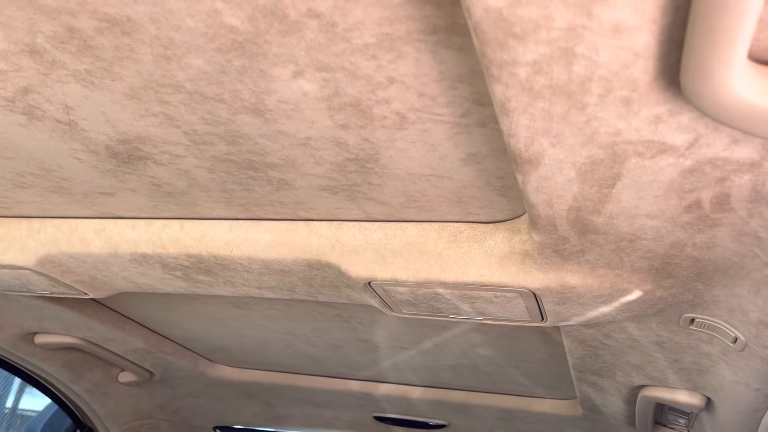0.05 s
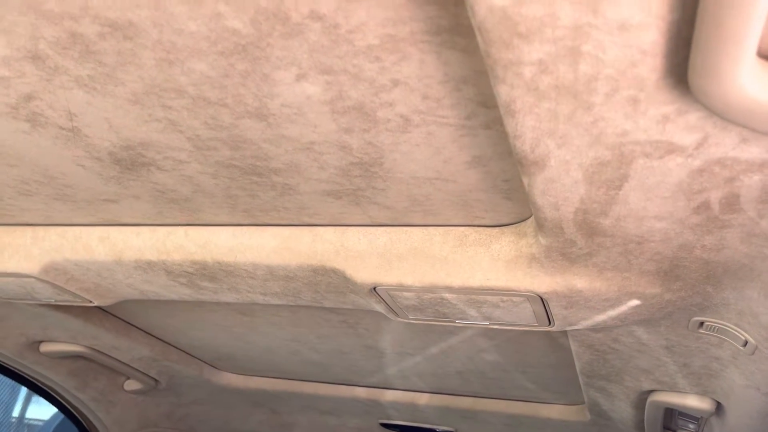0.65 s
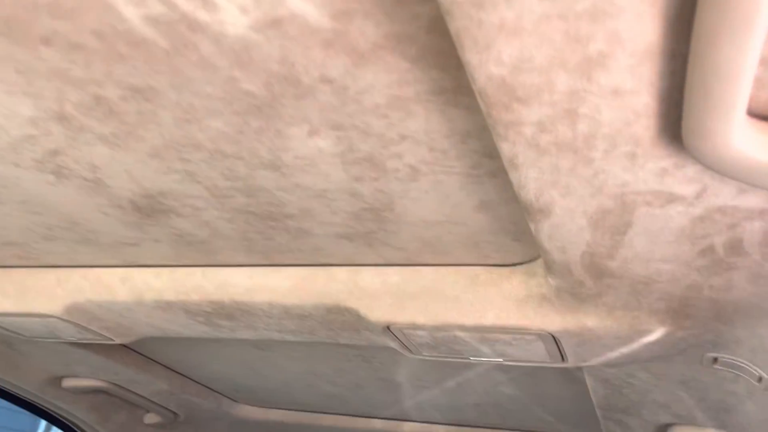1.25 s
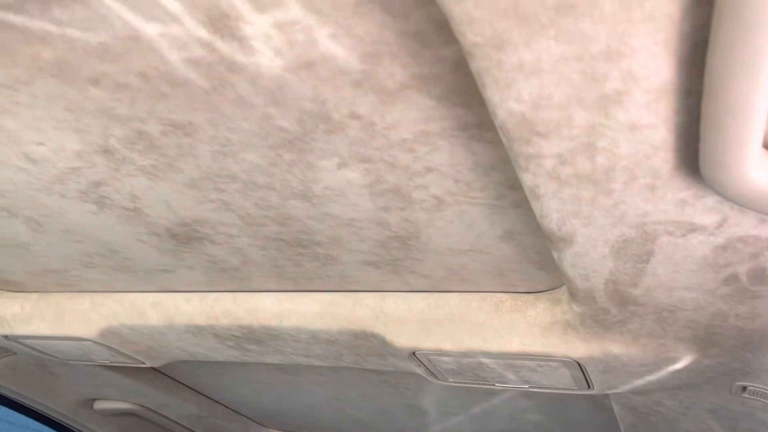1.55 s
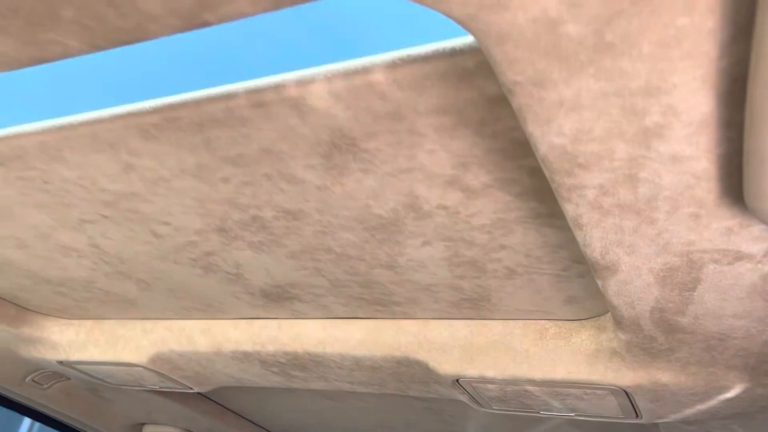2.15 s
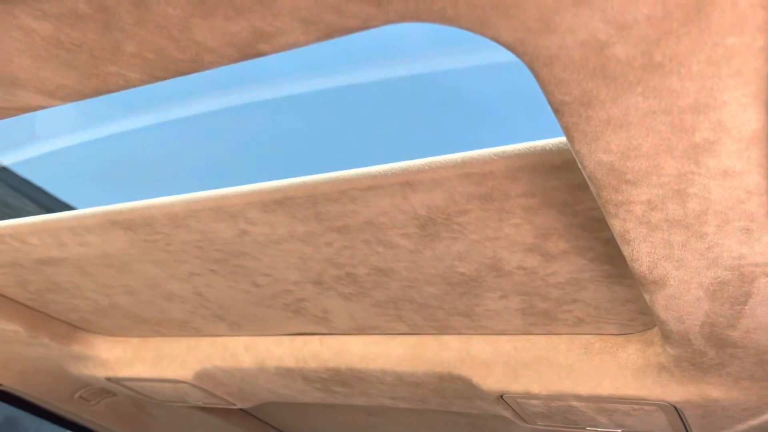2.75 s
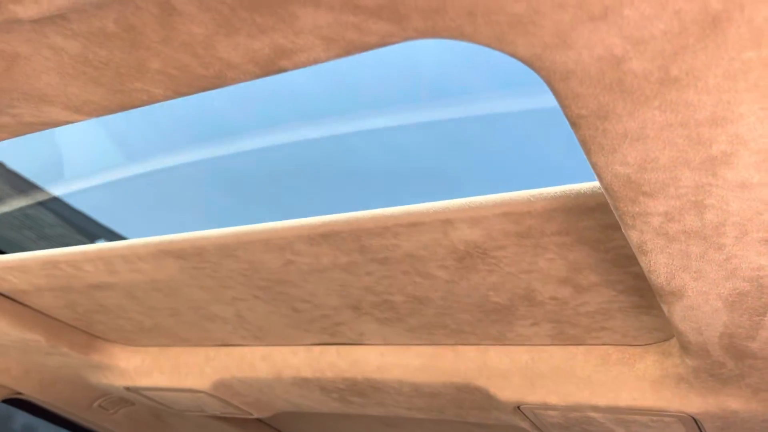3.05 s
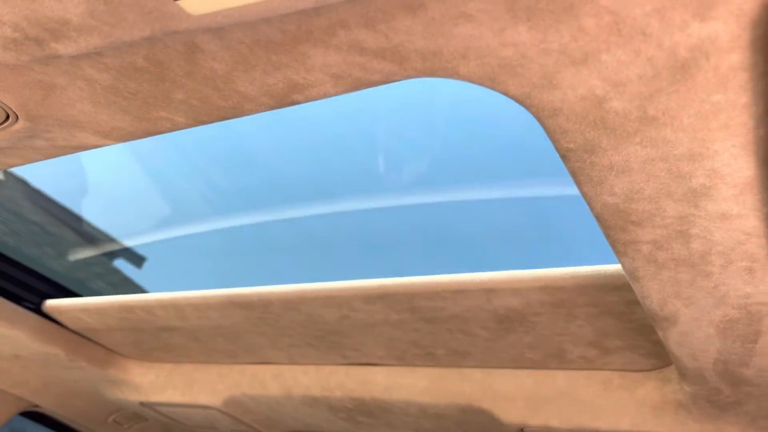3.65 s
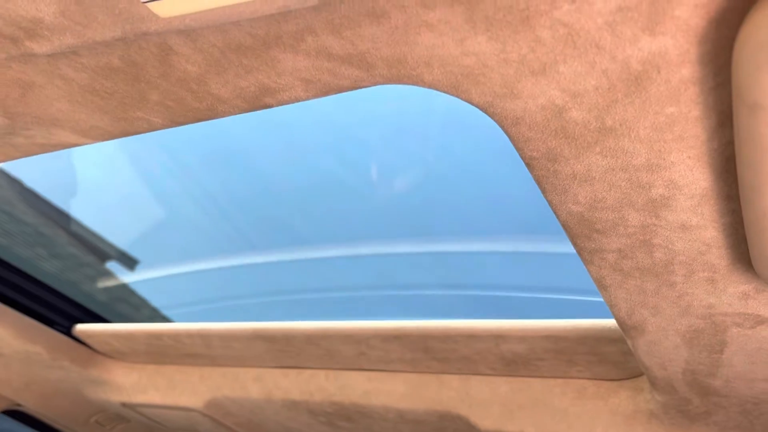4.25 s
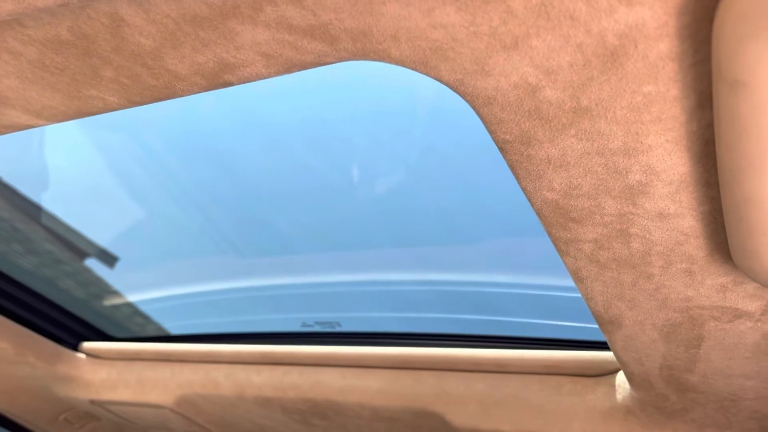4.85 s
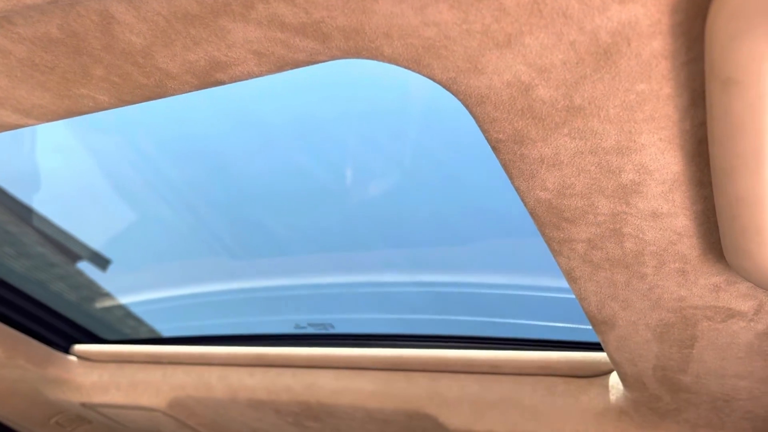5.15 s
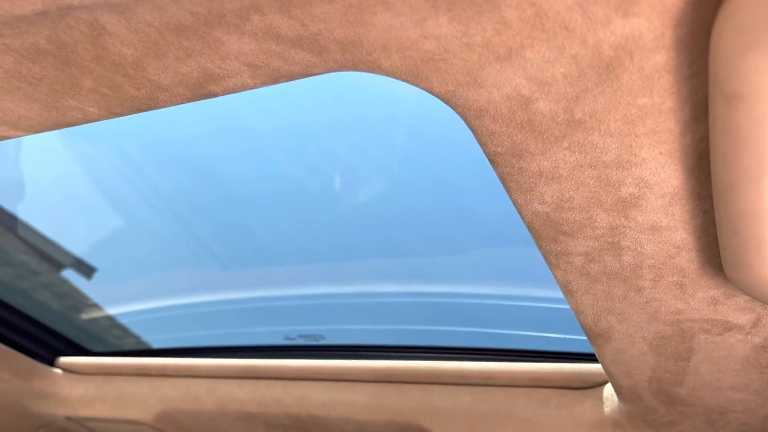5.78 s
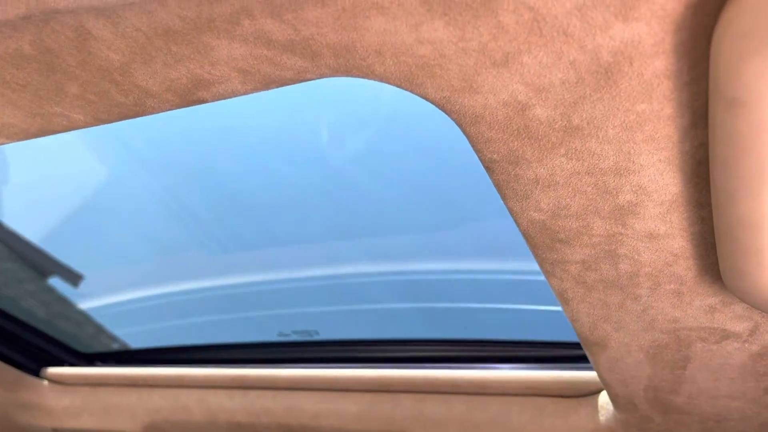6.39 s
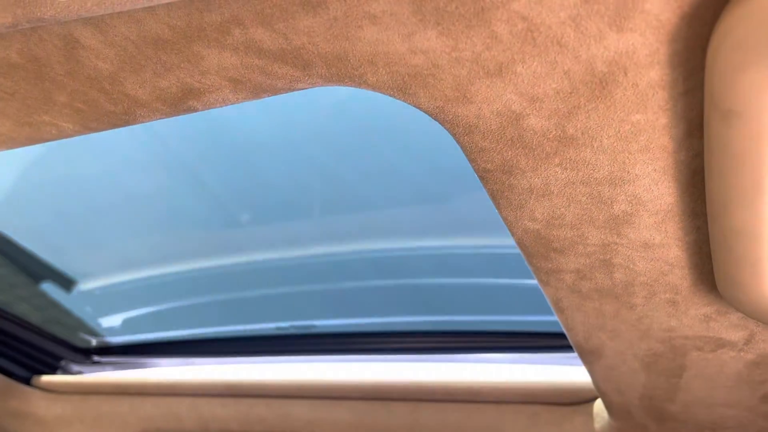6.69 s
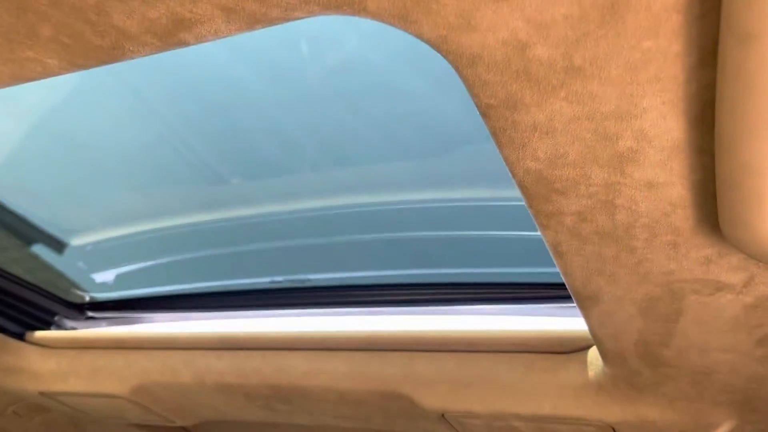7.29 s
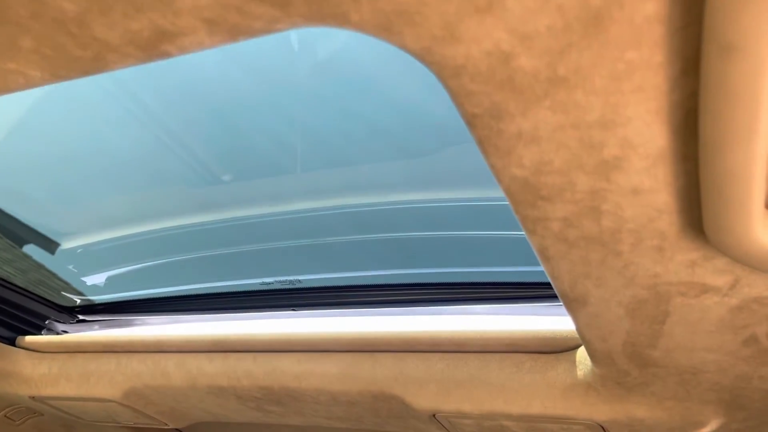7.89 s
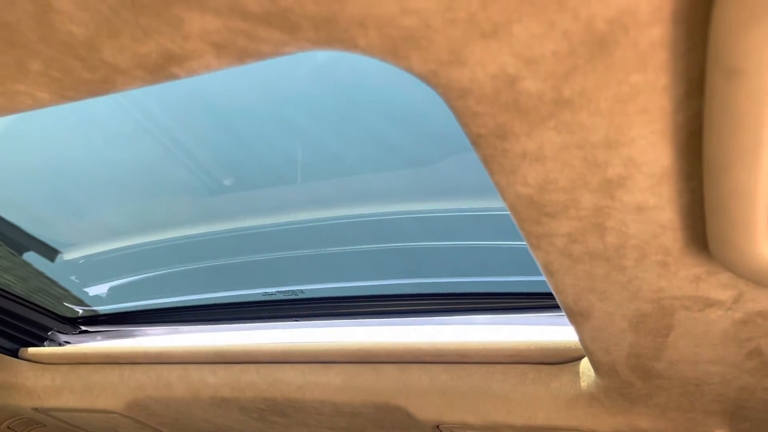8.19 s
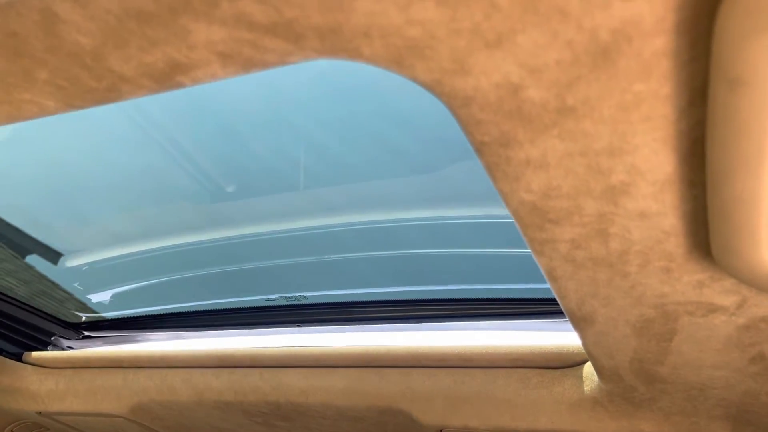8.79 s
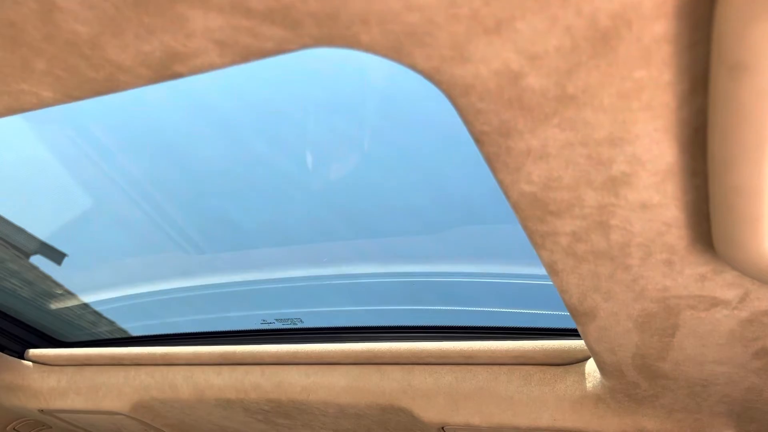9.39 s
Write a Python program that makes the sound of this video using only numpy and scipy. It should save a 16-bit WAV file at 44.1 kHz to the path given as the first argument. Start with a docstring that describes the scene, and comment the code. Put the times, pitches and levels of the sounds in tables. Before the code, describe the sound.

Inside an idling car, the ventilation blows and birds chirp faintly outside. A switch clicks and a small motor whines as the sunshade slides back, scraping louder until it bumps its stop. After more clicks, the glass roof panel unlatches and lifts, chafing on its rubber seal. Later it is sent back with clicks and a deep clunk. A phone picks it all up from just below the roof.

```python
"""Inside an idling car, the ventilation blows and birds chirp faintly outside. A switch clicks, and a
small motor slides the sunshade back along its guides, scraping ever louder into its pocket until it bumps
its stop. More switch clicks, and the glass panel lifts off its seal, chafing; later it is sent back with
a clunk. A phone with two ports hears it all from below the roof."""
import sys
import numpy as np
from scipy import signal
from scipy.fft import rfft, irfft, next_fast_len
from scipy.io import wavfile
from scipy.ndimage import uniform_filter1d

SR = 44100
rng = np.random.default_rng(int(sys.argv[2]) if len(sys.argv) > 2 else 0)


def master(y):
    """Save y as 16-bit WAV."""
    cut = np.clip(np.atleast_2d(y).T, -1, 1)
    pcm = np.round(cut * 32767)  # scale
    wavfile.write(sys.argv[1], SR, pcm.astype(np.int16))


N = 424683
T = np.arange(N) / SR
SHADE_START_S, SHADE_STOP_S = 1.52, 4.76
# modes of the roof frame (frequency [Hz], level [dB], t60 [s])
ROOF_MODES = [(94, -1, 0.071), (146, 4.5, 0.062), (257, 3, 0.059), (379, -4, 0.081), (466, -7, 0.086),
              (610, 2.5, 0.021), (940, -3, 0.06), (1166, -19, 0.044), (1438, -4.5, 0.05),
              (1980, -16, 0.035), (2990, -13, 0.067)]


def undb(db):
    """Decibels to gain."""
    return 10 ** (np.asarray(db) / 20)


def unit(x):
    """Scale to rms 1."""
    return x / np.sqrt(np.mean(x ** 2))


def filtered(x, gain):
    """Apply a response, given as a function of Hz."""
    size = next_fast_len(x.shape[-1])
    hz = np.arange(size // 2 + 1) * SR / size + 1e-3
    return irfft(rfft(x, size) * gain(hz), size)[..., :x.shape[-1]]


def colour(points):
    """An EQ curve through (frequency [Hz], level [dB]) points."""
    hz, db = np.transpose(points)
    return lambda f: undb(np.interp(np.log(f), np.log(hz), db))


def resonance(f, hz, width):
    """Response of one damped resonance, 1 at its centre."""
    return 1 / (1 + 1j * (f * f - hz * hz) / (f * width))


def resonate(x, hz, width):
    """Focus a sound around hz: two like resonances in series."""
    return filtered(x, lambda f: resonance(f, hz, width) ** 2)


def walk(rate):
    """Smooth random drift of rms 1, turning about rate times a second."""
    size = int(SR / rate)
    steps = np.repeat(rng.standard_normal(N // size + 2), size)
    return unit(uniform_filter1d(steps, size)[size:size + N])


def tone(hz):
    """A sine of rms 1 that follows a pitch curve."""
    return np.sqrt(2) * np.sin(2 * np.pi * np.cumsum(hz) / SR)


def add(out, s, sound):
    """Mix a short sound in at s seconds."""
    i = int(s * SR)
    out[:, i:i + sound.shape[-1]] += sound[..., :N - i]


def attack_at(x, db):
    """Set the rms level of the first 20 ms."""
    return x * undb(db) / np.sqrt(np.mean(x[..., :SR // 50] ** 2))


def field(size=N, side_db=0):
    """White noise at two ports: alike in the bass, diffuse in the mids."""
    # stereo width of the cabin (frequency [Hz], side minus mid [dB])
    diffusion = [(50, -15.5), (130, -17), (280, -10.5), (450, -4), (900, 1.5), (1600, -0.5), (2500, -6.5),
                 (5000, -8.5), (8000, -28.5)]
    mid, side = rng.standard_normal((2, size))
    ratio = lambda f: colour(diffusion)(f) * undb(side_db)
    mid = filtered(mid, lambda f: 1 / np.hypot(1, ratio(f)))
    side = filtered(side, lambda f: ratio(f) / np.hypot(1, ratio(f)))
    return np.array([mid + side, mid - side])


def air(spectrum, side_db, roof_db=-12):
    """Stereo noise with a spectrum in dB per Hz; the roof's upper modes stand a little out of it."""
    modes = lambda f: sum(resonance(f, hz, np.log(1000) / (np.pi * t60)) for hz, _, t60 in ROOF_MODES[6:])
    response = lambda f: colour(spectrum)(f) * (1 + undb(roof_db) * modes(f))
    return filtered(field(side_db=side_db), response) * np.sqrt(SR / 2)


def idle(flutter_db=1.5, pitch_wander=0.00489):
    """The bed: wavering engine tones and a clear blower tone over rumble and vent air."""
    # tones of the idling engine (frequency [Hz], level [dB])
    hum = [(29.2, -50), (62.02, -35), (104.05, -43.5), (124.6, -45), (134.9, -49), (189.8, -48),
           (262.2, -50)]
    # the ventilation blower's tone, sinking a little (time [s], pitch [Hz], level [dB])
    blower_curve = [(0, 318.8, -45.5), (3.9, 318.3, -46.5), (6.3, 316.4, -47), (9.6, 315.9, -46.5)]
    # cabin rumble and vent air (frequency [Hz], level [dB per Hz])
    cabin_spectrum = [(18, -106), (30, -74), (50, -56.5), (80, -55), (115, -54), (165, -61), (280, -63.5),
                      (380, -69), (800, -75.5), (1300, -79.5), (1700, -84.5), (2200, -88), (3500, -99.0),
                      (7000, -108.0), (9600, -105), (11400, -126), (13500, -155)]
    engine = sum(undb(db + flutter_db * walk(6)) * tone(hz * (1 + pitch_wander * walk(2.5)))
                 for hz, db in hum)
    times, pitch, level = np.transpose(blower_curve)
    blower = undb(np.interp(T, times, level) + 0.5 * walk(5.8)) * tone(np.interp(T, times, pitch))
    return engine + blower + air(cabin_spectrum, side_db=2.5) * undb(0.92 * walk(12))


def twitter(note_s, start_s=0.036, gap_s=0.045, high_hz=8430, low_hz=7650, fade_db_per_s=10):
    """A small bird's fading run of notes: high ones and softer low ones in turn, at an uneven pace."""
    notes = []
    for k, (sharp, loud, late) in enumerate(rng.standard_normal((13, 3))):
        s = abs(start_s + (k + .2 * late) * gap_s)
        detune = 1 + .035 * sharp
        db = -63 - fade_db_per_s * k * gap_s + 4 * loud
        notes += [(s, note_s, high_hz * detune, db), (s + gap_s / 2, note_s, low_hz * detune, db - 5.5)]
    return notes


def birds(note_s=0.022, arch_hz_per_s=7500, slur_hz_per_s=14000, echo_t60=0.35, echo_db=-3):
    """Wavering, arched whistles, the short ones slurred up or down; they scatter on the way in."""
    # lone calls of a second bird (time [s], length [s], top pitch [Hz], level [dB])
    chirps = [(0.612, 0.054, 4700, -72), (0.94, 0.038, 3930, -70), (1.255, 0.032, 3950, -68),
              (4.987, .085, 3920, -67)]
    out, wobble = np.zeros((1, N)), 1 + .016 * walk(500)
    for s, length, top_hz, db in twitter(note_s) + chirps:
        u = np.linspace(-1, 1, int(length * SR))
        slur = slur_hz_per_s * rng.standard_normal() * (length <= note_s)
        contour = top_hz + length * (slur * u / 2 - arch_hz_per_s * u ** 2)
        whistle = tone(contour * wobble[int(s * SR):][:len(u)])
        add(out, s, undb(db) * unit(signal.windows.tukey(len(u), .3) * whistle))
    t = T[:SR // 4]
    echo = field(len(t)) * undb(-60 * t / echo_t60)
    echo /= np.sqrt(np.sum(echo ** 2) / 2)
    return out + undb(echo_db) * signal.fftconvolve(out, echo, axes=1)[:, :N]


def clicks(tail_db=-21, tail_t60=0.18, ring_t60=.02):
    """A brief contact rattles the trim and rings the struck part; the padded cabin adds a short tail."""
    # clicks of switches and trim
    # (time [s], level [dB], brightness [dB per octave], contact time [s], ring [Hz], ring level [dB])
    contacts = [(0.066, -52.5, 1.5, 0.0071, 2020, -50), (0.83, -69, -4, .002, 6460, -70),
                (1.222, -69, 6, 0.0028, 2020, -67), (1.283, -58.5, 0.5, 0.0081, 2360, -54.5),
                (1.393, -58.5, 0, 0.0028, 2500, -68), (1.461, -59, 0, .003, 10900, -56),
                (1.498, -52.5, 5, 0.0027, 10300, -45), (1.541, -41.5, 4, 0.0066, 2170, -41),
                (1.545, -53, -3, 0.0071, 2700, -50), (1.885, -46, 0, .0043, 8960, -51),
                (1.943, -54, 0.5, .004, 2100, -50), (4.755, -56, -1, 0.0098, 1000, -51),
                (5.58, -61, -7.5, 0.012, 2940, -65), (5.803, -59, 0, .002, 2250, -69),
                (5.828, -41, 5, 0.0034, 6200, -49), (5.871, -56.5, 0, .0018, 7900, -60),
                (5.908, -51.5, 1.5, 0.0031, 7900, -51), (5.971, -53, -0.5, 0.004, 5870, -54),
                (6.029, -52, 3, 0.0072, 2050, -42), (6.219, -59, -6, .003, 2600, -54),
                (6.325, -56, 1.5, 0.0029, 5300, -58), (6.696, -57, 2.5, 0.0035, 2200, -63),
                (7.315, -53.5, 3.5, 0.011, 2420, -59), (8.428, -65, 10, 0.0022, 2300, -61),
                (8.6, -48, -1.5, 0.0053, 2350, -45.5), (8.622, -51, 0, 0.0045, 3400, -55),
                (8.663, -60, 3, .0023, 7500, -55), (8.691, -56, 1, 0.0034, 6170, -63),
                (8.722, -62, -12, 0.0051, 6300, -53), (8.743, -59, -8, .004, 4540, -54)]
    # colour of the clicks: plastic trim resonances and the microphone's bright peak near 10 kHz
    # (frequency [Hz], width [Hz], level [dB])
    click_peaks = [(2270, 1100, 8), (3330, 860, 1), (5850, 1750, 14), (9460, 3500, 18)]
    # a click's body, edge, snap and top (low edge [Hz], high edge [Hz])
    bands_hz = [(1400, 4200), (4200, 7500), (7500, 11400), (12400, 15800)]
    band_db = np.array([2, 0, 2.5, -24])
    bands = [signal.butter(3, band, "band", fs=SR, output="sos") for band in bands_hz]
    octaves = np.log2(np.array(bands_hz) / 5000).mean(axis=1)
    click_colour = lambda f: sum(undb(db) * resonance(f, hz, width) for hz, width, db in click_peaks)
    ring_width = np.log(1000) / (np.pi * ring_t60)
    out, t = np.zeros((2, N)), T[:SR // 8]
    for s, level_db, brightness, contact_s, ring_hz, ring_db in contacts:
        direct = field(len(t)) * np.exp(-t / contact_s)
        tail = field(len(t)) * undb(tail_db - 60 * t / tail_t60)
        crack = filtered(direct + tail, click_colour)
        for band, db in zip(bands, level_db + band_db + brightness * octaves):
            add(out, s, attack_at(signal.sosfilt(band, crack), db))
        ring = filtered(direct, lambda f: resonance(f, ring_hz, ring_width))
        add(out, s, attack_at(ring, ring_db))
    return out


def chafes(grip_db=2, spurt_db=2):
    """A rubbing contact sticks and slips in spurts, ringing one broad resonance."""
    # chafes and squeaks of guides and rubber seals
    # (time [s], length [s], pitch [Hz], width [Hz], level [dB])
    rubs = [(1.454, .07, 750, 1100, -45.5), (6.134, 0.008, 4750, 1500, -51),
            (6.157, 0.012, 5170, 1200, -57), (6.204, 0.11, 850, 646, -44), (6.228, 0.069, 5530, 6000, -58),
            (6.544, 0.125, 2700, 1500, -53), (8.789, 0.15, 2380, 1200, -57)]
    out, grip = np.zeros((2, N)), undb(grip_db * walk(150) + spurt_db * walk(30))
    for s, length, hz, width, db in rubs:
        size = int(length * SR)
        envelope = signal.windows.tukey(size, .5) * grip[int(s * SR):][:size]
        add(out, s, undb(db) * unit(resonate(field(size), hz, width) * envelope))
    return out


def knocks(rattle_top_hz=6000, rattle_db=-7.5, rattle_t60=.065, breadth=0.75):
    """The drive takes up slack, latches or meets a stop: the roof frame rings and loose parts rattle."""
    # bumps of the drive (time [s], level [dB], spectral centre [Hz])
    bumps = [(1.468, -34.5, 383), (1.484, -31, 338), (1.885, -37.5, 390), (4.763, -31, 390),
             (5.981, -31, 250), (6.01, -35.5, 930), (6.033, -39.5, 485), (8.736, -33.5, 590),
             (8.774, -27.5, 102)]
    out, t = np.zeros((2, N)), T[:SR // 4]
    hz, db, t60 = np.transpose(ROOF_MODES)[:, :, None]
    for s, level_db, centre_hz in bumps + latch_blows():
        # low modes start together; higher ones reach the two ports with unlike phases
        phase = rng.standard_normal((2, *hz.shape)) * np.minimum(hz / 700, 1.1)
        ring = np.sum(undb(db - 60 * t / t60) * np.sin(2 * np.pi * hz * t + phase), axis=1)
        rattle = filtered(field(len(t)), lambda f: 1 / (1 + (f / rattle_top_hz) ** 8))
        rattle *= undb(-60 * t / rattle_t60)
        hit = attack_at(ring, 0) + attack_at(rattle, rattle_db)
        add(out, s, attack_at(resonate(hit, centre_hz, breadth * centre_hz), level_db))
    return out


def running(start, stop, spin_up_s=0.011, spin_down_s=0.029):
    """A motor's effort, 0-1: it spins up, holds and spins down."""
    return np.clip((T - start) / spin_up_s, 0, 1) * np.clip(1 - (T - stop) / spin_down_s, 0, 1)


def slide(motor, rub, spectrum, split_hz, grain_db):
    """A driven panel: the motor shakes the roof below split_hz, grainy friction hisses above it."""
    noise = air(spectrum, side_db=-0.5)
    low = filtered(noise, lambda f: 1 / (1 + (f / split_hz) ** 2))
    rumble = low * motor * undb(0.19 * walk(27))
    hiss = (noise - low) * rub * undb(grain_db * walk(400) + 0.5 * walk(22))
    return rumble + hiss


def shade(drag_start_db=-16.5, drag_end_db=-2.5, build_s=0.74, whine_hz=624, whine_db=-53.5, sag=.022):
    """The sunshade rubs louder as its drag builds; the motor's whine swells and creeps up to pitch."""
    # friction of the sunshade in its guides (frequency [Hz], level [dB per Hz])
    friction_spectrum = [(150, -64), (260, -61), (450, -76), (750, -82.5), (1300, -88), (2100, -88.5),
                         (3200, -91), (5300, -92.5), (7000, -93), (8800, -89), (10400, -85.5),
                         (11500, -91.5), (12500, -113), (14000, -155)]
    motor = running(SHADE_START_S, SHADE_STOP_S)
    slack = np.exp(-np.maximum(T - SHADE_START_S, 0) / build_s)
    drag = undb(drag_end_db + (drag_start_db - drag_end_db) * slack)
    hz = whine_hz * (1 - sag * slack) * (1 + 0.00404 * walk(25))
    swell = motor * np.sqrt(1 - slack) * undb(whine_db + 2 * walk(16))
    whine = swell * (tone(hz) + undb(-15) * tone(2 * hz))
    return whine + slide(motor, motor * drag, friction_spectrum, split_hz=2800, grain_db=1.1)


def latch_blows(crack_hz=2580, catch_hz=1420, rail_hz=670):
    """Hits for knocks(): each latch cracks and strikes its catch, then rail and frame, ever deeper."""
    # latches (time [s], crack [dB], catch [dB], settling time [s], frame [dB], frame centre [Hz])
    latches = [(1.541, -49, -42.5, 0.0033, -33, 310), (6.025, -45, -40.5, 0.0039, -30, 254),
               (8.722, -44.5, -32, 0.0127, -24.5, 200)]
    hits = []
    for s, crack_db, catch_db, settle_s, frame_db, frame_hz in latches:
        hits += [(s, crack_db, crack_hz), (s, catch_db, catch_hz),
                 (s + settle_s / 2, catch_db + 2, rail_hz), (s + settle_s, frame_db, frame_hz)]
    return hits


def tight_spot(peak_s=3.18, spread_s=0.56, peak_db=-56.5, grain_db=1.7):
    """The shade's edge rubs harder, then eases, as it passes a tight stretch of its guides."""
    pressure = running(SHADE_START_S, SHADE_STOP_S) / (1 + ((T - peak_s) / spread_s) ** 2)
    rub = unit(resonate(field(), hz=1900, width=660))
    return rub * pressure * undb(peak_db + grain_db * walk(150))


def pocket(growth_db_per_s=7.5, grain_db=1.8, spurt_db=.7):
    """The deeper the shade slides into its roof pocket, the louder it scrapes there."""
    # resonances of the pocket (frequency [Hz], width [Hz], level at the stop [dB])
    pocket_modes = [(790, 480, -45.5), (5000, 2000, -58.5)]
    depth = running(SHADE_START_S, SHADE_STOP_S) * undb(-growth_db_per_s * np.abs(SHADE_STOP_S - T))
    noise = field()
    scrape = sum(undb(db) * unit(resonate(noise, hz, width)) for hz, width, db in pocket_modes)
    return scrape * depth * undb(grain_db * walk(250) + spurt_db * walk(40))


def glass(hum_hz=68, hum_db=-42):
    """The panel rises off its seal and later settles back; its motor's hum beats against the engine's."""
    # the panel's runs, up and then down (start [s], stop [s], motor gain [dB],
    # tightest on the seal [s], rub gain there [dB], easing [dB per s])
    runs = [(5.957, 6.703, 1, 6.47, -2.5, 7), (8.697, 9.302, -1.5, 8.85, 0, 20)]
    # drive and seal noise (frequency [Hz], level [dB per Hz])
    drive_spectrum = [(200, -65.5), (450, -73.5), (900, -77), (1500, -82), (2400, -86.5), (4000, -92.5),
                      (7000, -100.7), (8800, -95.5), (10200, -94), (11500, -112), (14000, -155)]
    motor, rub = 0, 0
    for start, stop, motor_db, tight_s, rub_db, easing in runs:
        effort = running(start, stop)
        motor += effort * undb(motor_db)
        rub += effort * undb(rub_db - easing * np.abs(T - tight_s))
    hum = motor * undb(hum_db) * tone(hum_hz * (1 + 0.0148 * walk(5)))
    return hum + slide(motor, rub, drive_spectrum, split_hz=890, grain_db=0.5)


def scene():
    """The roof mechanism over the bed of engine, vents and birds."""
    return shade() + tight_spot() + pocket() + glass() + chafes() + clicks() + knocks() + idle() + birds()


def record(dry, top_hz=15750):
    """The two ports differ in sensitivity and phase; the phone cuts the top."""
    # sensitivity of the ports (frequency [Hz], left minus right [dB])
    port_balance = [(60, 0), (110, 2), (200, 1), (350, 0), (640, 1.5), (1150, -2), (2080, 0.5), (3770, 2.5),
                    (6800, 4), (9000, 0)]
    # the left port's phase lead, swinging around the ports' resonance (frequency [Hz], lead [rad])
    port_lead = [(200, 0), (2000, 0), (3000, 0.76), (5200, 0.6), (6600, 0.9), (7700, 0.65), (8700, 0),
                 (10250, -3.5), (11200, -4.5), (11900, -4)]
    balance = lambda f: np.sqrt(colour(port_balance)(f))
    lead = lambda f: np.exp(1j * np.interp(f, *np.transpose(port_lead)))
    left = filtered(dry[0], lambda f: balance(f) * lead(f))
    right = filtered(dry[1], lambda f: 1 / balance(f))
    high_cut = signal.ellip(8, .2, 70, top_hz, fs=SR, output="sos")
    return signal.sosfilt(high_cut, np.array([left, right]))


dry = scene()
out = record(dry)
master(out)
```